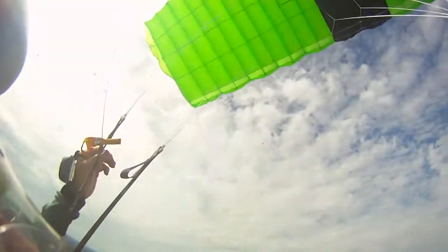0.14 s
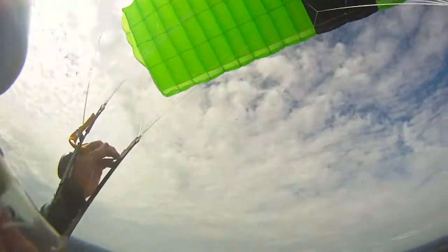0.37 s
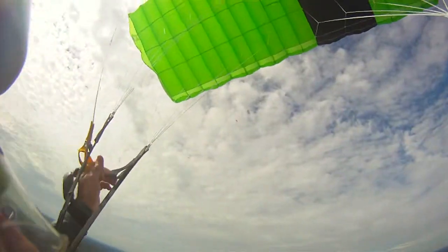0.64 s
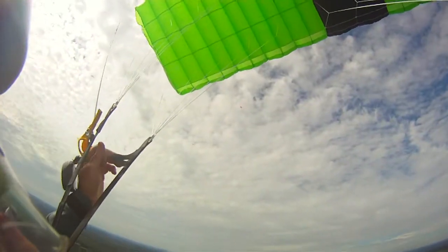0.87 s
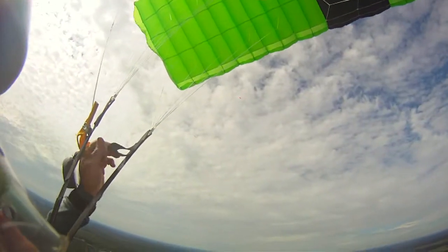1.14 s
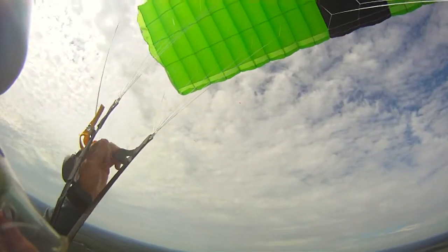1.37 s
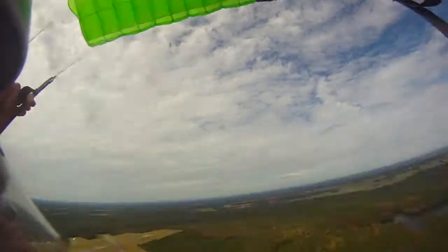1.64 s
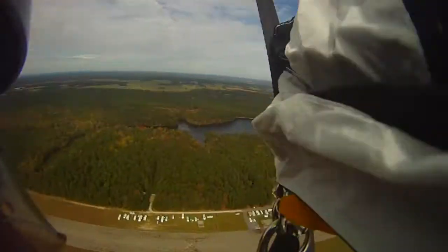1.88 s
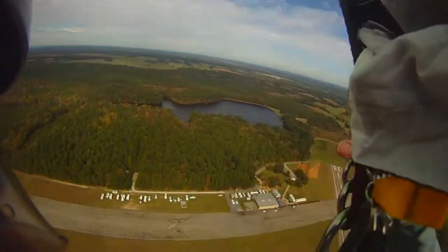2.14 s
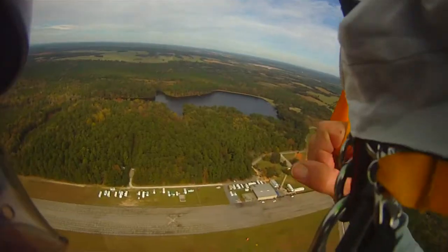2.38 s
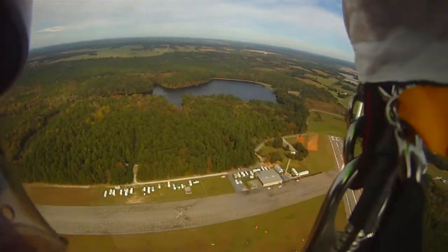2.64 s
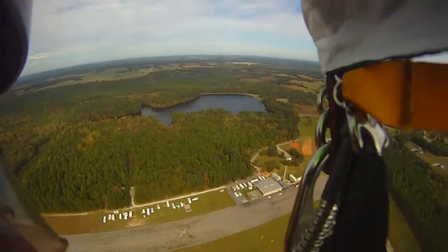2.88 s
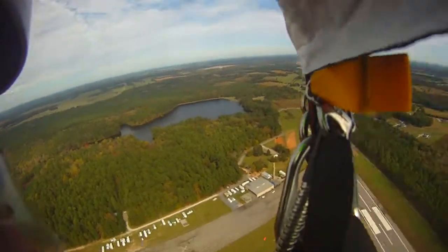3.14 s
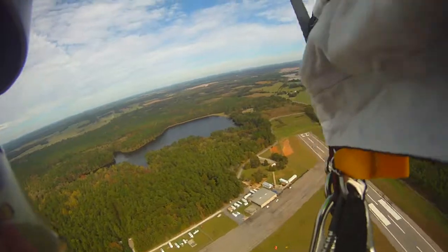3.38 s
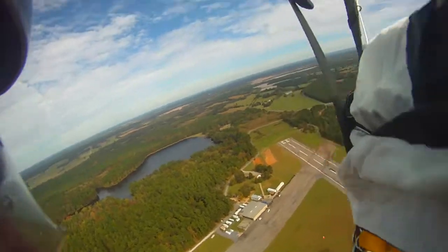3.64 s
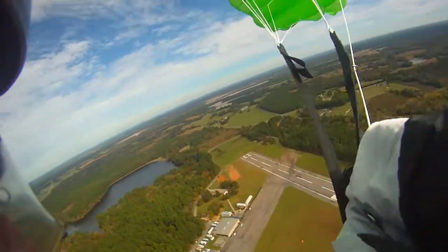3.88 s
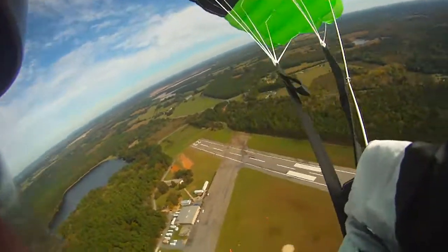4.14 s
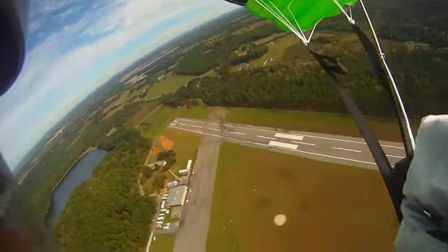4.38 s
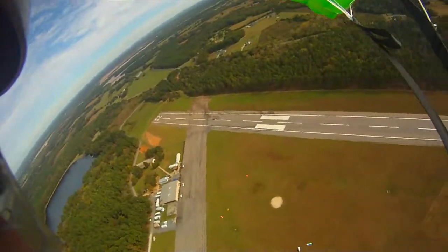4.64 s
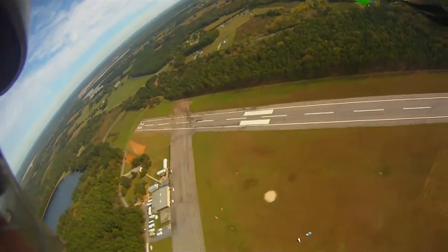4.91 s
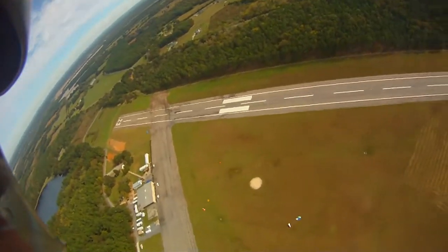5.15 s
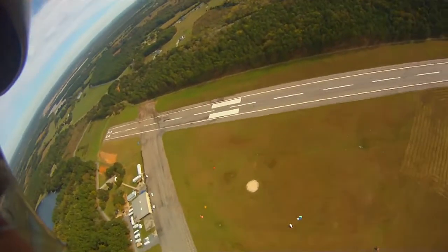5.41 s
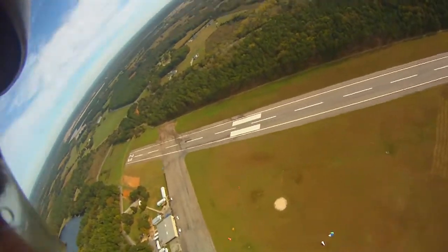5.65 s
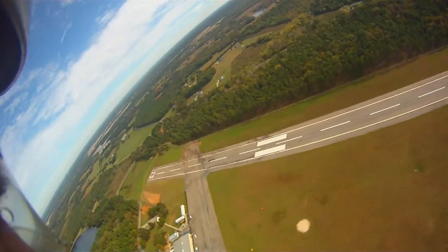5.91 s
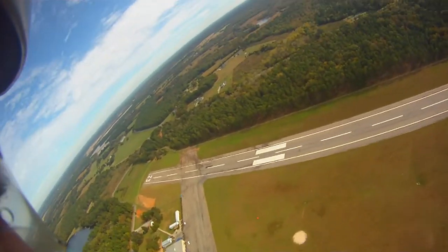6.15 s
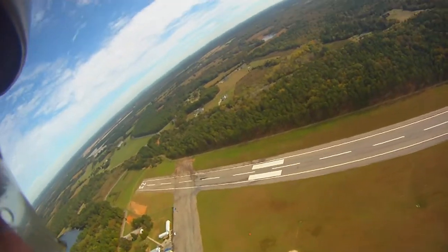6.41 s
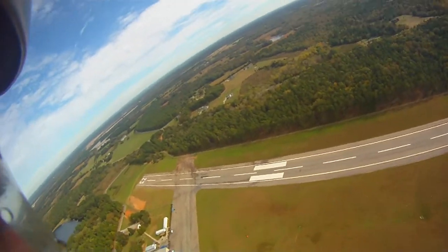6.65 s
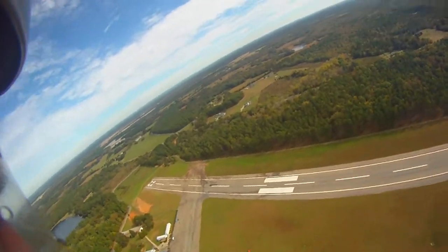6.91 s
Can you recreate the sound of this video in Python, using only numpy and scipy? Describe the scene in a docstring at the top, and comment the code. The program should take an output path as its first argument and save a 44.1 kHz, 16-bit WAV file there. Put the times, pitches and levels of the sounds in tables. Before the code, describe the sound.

Quiet, hollow airy rush under a parachute, then violent wind buffeting thumps the microphone in two bouts, easing into a steady rush with fabric fluttering.

```python
"""Wind rushes over a sealed camera on a helmet under a parachute. When the head turns into the stream, eddies
thump on the microphone port: short pulses over a turbulent wash. Coloured noise makes the rush, the ring of the
hollow housing and the hiss past its edges. Gliding resonances moan and whistle; decaying modes knock and noise
puffs flap; a faint noise floor, cut off above 12.7 kHz, and one thin tone lie beneath."""
import sys
import numpy as np
from scipy import signal
from scipy.fft import next_fast_len
from scipy.io import wavfile
from scipy.ndimage import uniform_filter1d

SR = 44100
rng = np.random.default_rng(int(sys.argv[2]) if len(sys.argv) > 2 else 0)


def wrap_up_sound(samples):
    """Save the sound to the file named by the first command line argument, as 16-bit audio."""
    columns = np.atleast_2d(samples).T
    # keep every value between -1 and 1, then stretch to whole-number steps
    tamed = np.clip(columns, -1, 1)
    steps = np.round(tamed * 32767).astype(np.int16)
    wavfile.write(sys.argv[1], SR, steps)


def gain_from_decibels(decibels):
    """Convert decibel values to linear amplitude factors."""
    exponent = np.asarray(decibels, float) / 20
    return 10 ** exponent


N = 310023
TIME_S = np.arange(N) / SR


def evened(x):
    """Scales to rms 1."""
    return x / np.sqrt(np.mean(x ** 2) + 1e-20)


def curve(rows):
    """Columns of a table, after its times, as values at every sample."""
    times_s, *columns = np.transpose(rows)
    return [np.interp(TIME_S, times_s, column) for column in columns]


def bumps(rows):
    """Sum of bell curves in dB, one per event; length is the full width at 1/e."""
    return sum(db * np.exp(-(2 * (TIME_S - s) / length_s) ** 2) for s, db, length_s in rows)


def colour(x, points, causal=True, size=4096):
    """Filter of energy 1 with the given spectrum: ringing after the input, or symmetric around it."""
    hz, db = np.transpose(points)
    grid_hz = abs(np.fft.fftfreq(size, 1 / SR))
    log_gain = np.log(gain_from_decibels(np.interp(np.log(grid_hz + 1), np.log(hz), db)))
    # the Hilbert transform of the log gain gives minimum phase
    spectrum = np.exp(np.conj(signal.hilbert(log_gain)) if causal else log_gain)
    taps = np.fft.fftshift(np.fft.ifft(spectrum).real)
    return signal.oaconvolve(x, taps / np.linalg.norm(taps))[size // 2:][:len(x)]


def resonate(x, hz, width_hz):
    """Shifts hz down to zero, smooths, and shifts back: a resonance of gain 1."""
    turn = np.exp(2j * np.pi * np.cumsum(hz * np.ones(len(x))) / SR)
    pole = np.exp(-np.pi * width_hz / SR)
    return 2 * (turn * signal.lfilter([1 - pole], [1, -pole], x / turn)).real


def flicker(depth_db, seconds):
    """A random gain of mean power 1 that wanders over the given time."""
    size = max(int(seconds * SR), 1)
    wander = uniform_filter1d(uniform_filter1d(rng.standard_normal(N), size), size)
    return evened(gain_from_decibels(depth_db * evened(wander)))


def impulses(per_s, spread_db):
    """Random clicks, rms 1; a spread makes many small and a few large."""
    sizes = gain_from_decibels(spread_db * np.minimum(rng.exponential(1, N), 2.8))
    return evened((rng.random(N) < per_s / SR) * sizes)


def marks(rows):
    """One click at each event of a table, with the sign of its third column."""
    out = np.zeros(N)
    for s, db, *sign in rows:
        out[int(s * SR)] = gain_from_decibels(db) * np.sign(np.prod(sign))
    return out


def skewed(clicks):
    """Every eddy drags the pressure down, then lets it spring back, whichever way its click points."""
    return clicks + 0.5 * signal.hilbert(abs(clicks), next_fast_len(N)).imag[:N]


def narrow(rows, width_hz):
    """Broken noise in a gliding resonance, sounding only while its table lasts."""
    hz, db = curve(rows)
    once = resonate(rng.standard_normal(N), hz, width_hz)
    fuzzy = evened(resonate(once, hz, width_hz))
    broken = gain_from_decibels(db) * fuzzy * flicker(3.2, 0.015)
    return broken * ((TIME_S > rows[0][0]) & (TIME_S < rows[-1][0]))


def dive():
    """Progress 0-1 of the canopy's dive."""
    return np.interp(TIME_S, [4.7, 6.8], [0, 1])


# stream striking the port as the head turns [t/s, level/dB]
PORT_LEVEL = [(0, -56), (.12, -57.5), (.14, -46.5), (.155, -55), (.2, -51.5), (.3, -55.5), (.41, -57),
              (1.45, -52.5), (1.63, -49), (1.71, -66.5), (1.8, -63.5), (1.86, -40), (1.94, -33.5),
              (2.3, -34), (2.55, -32), (2.78, -34), (2.95, -31.5), (3.1, -34), (3.55, -37), (3.63, -43),
              (3.82, -45), (3.92, -38.5), (4.45, -39), (4.68, -36), (4.76, -37), (4.8, -42.5), (4.9, -39),
              (5.05, -34.5), (5.42, -31.5), (5.66, -35.5), (5.74, -45), (6.0, -54), (6.35, -59.5),
              (7.03, -65.5)]
# port in the wake of the helmet, where eddies push instead of suck [t/s, share 0-1]
WAKE_SHARE = [(0, .85), (.35, .85), (.6, .6), (1.7, .6), (1.9, .45), (2.05, .15), (2.2, .05), (2.7, .05),
              (2.9, .25), (3.1, .2), (3.55, .15), (3.7, .9), (4.1, .85), (4.45, .75), (4.55, .2),
              (4.75, .2), (4.85, .45), (5.03, .1), (5.25, .1), (5.35, .4), (5.5, .35), (5.65, .2),
              (5.75, 0)]
# brief drops of the buffeting [t/s, depth/dB, length/s]
LULLS = [(2.11, 4.5, 0.036), (3.03, 3.5, 0.034), (3.47, 0.5, 0.047), (3.82, 10, 0.026), (4.05, 5.5, 0.033),
         (4.17, 3, 0.041), (4.48, 5.5, 0.046), (4.83, 1.5, 0.17), (5.2, 1.5, 0.3), (5.3, 1, 0.047),
         (5.51, 1.5, .05), (5.62, 0, .04)]
# eddy colour, sheltered and in the full stream [f/Hz, relative level/dB]
SHELTERED_COLOUR = [(60, -31.5), (130, -13), (240, -5.5), (450, -4.5), (900, -14), (1500, -17.5),
                    (3000, -35.5), (9000, -66), (15000, -100)]
EXPOSED_COLOUR = [(60, -41), (130, -18), (240, -4.5), (500, 1), (900, -0.5), (1500, -8), (3000, -22.5),
                  (9000, -53), (13000, -56), (15000, -65)]
# strongest single eddies [t/s, level/dB, -1 suction or +1 push]
THUMPS = [(0.1393, -39, -1), (0.2022, -44, 1), (0.2188, -40, -1), (1.596, -37, -1), (1.9354, -21, 1),
          (1.9507, -23, -1), (2.0486, -29, 1), (2.1583, -23, -1), (2.1669, -28, -1), (2.3185, -17.5, -1),
          (2.3437, -23, -1), (2.3792, -15.5, -1), (2.3833, -20, -1), (2.4422, -18, -1), (2.4947, -21, -1),
          (2.5781, -15, -1), (2.5908, -20, -1), (2.8598, -16, -1), (2.9082, -19, -1), (2.9244, -26, 1),
          (2.9523, -22, 1), (3.0732, -20, -1), (3.1173, -19, -1), (3.2571, -23, -1), (3.2783, -21, -1),
          (3.3286, -23, -1), (3.3845, -26, -1), (3.4129, -27, -1), (3.5109, -21, -1), (3.5362, -28, -1),
          (3.5569, -20.5, -1), (3.763, -34, 1), (3.7705, -32, -1), (3.8813, -27, 1), (3.9149, -23, 1),
          (3.9353, -26, 1), (3.9385, -32, -1), (4.0142, -23.5, -1), (4.1347, -22, -1), (4.3165, -26, 1),
          (4.3254, -25.5, 1), (4.4505, -23, 1), (4.589, -23, 1), (4.6027, -22, -1), (4.7185, -25, 1),
          (4.723, -26, -1), (4.7418, -22, -1), (5.0448, -28, -1), (5.0523, -31, -1), (5.0644, -34, -1),
          (5.0718, -22, -1), (5.1053, -24, -1), (5.1152, -18.5, -1), (5.1258, -20, -1), (5.1446, -16.5, -1),
          (5.1698, -18, -1), (5.1844, -17, -1), (5.2656, -17.5, -1), (5.3757, -16, -1), (5.3965, -17, -1),
          (5.4628, -21, 1), (5.5607, -19, -1), (5.6612, -32, -1)]
# their colour: small and fast, so brighter [f/Hz, relative level/dB]
THUMP_COLOUR = [(60, -30), (240, -13), (600, 3), (1200, -2), (2500, -16), (4500, -23.5), (7000, -38),
                (9000, -50), (15000, -80)]
# large slow eddies [f/Hz, relative level/dB]
RUMBLE_COLOUR = [(20, -54), (60, -8.5), (130, 3.5), (200, 6), (300, 2), (600, -47), (3000, -110)]
# swells and dips of the slow eddies rolling over the helmet [t/s, level change/dB, length/s]
ROLLS = [(.1, -8, 0.17), (.25, 5.5, 0.097), (2.92, 5, 0.27), (3.3, 6.5, 0.14), (3.76, 6.5, 0.052),
         (4.05, 5.5, 0.13), (4.3, 0, 0.18), (4.88, -6, .08), (5.75, -8, .3), (6.15, -1, .5)]


def buffet(shake):
    """Eddies sweep past the port as suction or push pulses, over a turbulent wash and a rumble."""
    port_db, wake = curve(PORT_LEVEL)[0], curve(WAKE_SHARE)[0]
    # the wake dulls the eddies
    bright = np.clip(0.9 - 0.83 * wake + 0.074 * np.log2(flicker(2.6, 0.05)), 0, 1)
    signs = np.where(rng.random(N) < wake, 1, -1)
    wash = 0.66 * rng.standard_normal(N) * shake
    drive = wash + 0.75 * skewed(signs * impulses(600, spread_db=3.0))
    dull_eddies = (1 - bright) * colour(drive, SHELTERED_COLOUR, causal=False)
    bright_eddies = bright * colour(drive, EXPOSED_COLOUR, causal=False)
    gusts = gain_from_decibels(port_db - bumps(LULLS)) * flicker(0.53, 0.028)

    pulse_peak = colour(np.ones(1), THUMP_COLOUR, causal=False)[0]
    thumps = colour(skewed(marks(THUMPS)), THUMP_COLOUR, causal=False) / pulse_peak

    # slow eddies follow the buffeting, dB per dB, and grow in the wake
    rumble_db = -31 + 0.79 * port_db + 13.5 * wake + bumps(ROLLS)
    rumble = colour(rng.standard_normal(N), RUMBLE_COLOUR) * flicker(1.4, 0.063)
    return gusts * (dull_eddies + bright_eddies) + thumps + gain_from_decibels(rumble_db) * rumble


# speed through the air, heard through the housing walls [t/s, level/dB]
AIRSPEED_LEVEL = [(0, -59.5), (.5, -57.5), (1.0, -56.5), (1.8, -52.5), (2.7, -54.5), (3.1, -45),
                  (3.55, -50), (3.7, -53), (4.7, -51.5), (5.5, -44), (6.2, -45), (7.03, -46)]
# air over the housing edges [t/s, level/dB]
EDGE_LEVEL = [(0, -70.5), (1.55, -63), (1.785, -66), (1.81, -48), (1.88, -52), (2.0, -48.5), (2.7, -45),
              (3.0, -48), (3.57, -49.5), (3.64, -56), (4.05, -56.5), (4.2, -55.5), (4.4, -55.5),
              (4.62, -51), (4.85, -55.5), (5.0, -52.5), (5.17, -47.5), (5.6, -42), (5.85, -46.5),
              (6.1, -49), (6.6, -51), (7.03, -53.5)]
# short surges and dips of the rush [t/s, level change/dB, length/s]
SURGES = [(1.87, 8.5, 0.055), (3.8, 12, 0.04), (4.32, 5, .04), (4.9, 6.5, 0.054), (5.27, -7, 0.026),
          (5.45, 4, .05), (5.58, 7, .08)]
# rush through the housing walls [f/Hz, relative level/dB]
RUSH_COLOUR = [(40, -23.5), (200, -19), (400, -15.5), (1000, -5), (1300, 2), (2000, 1.5), (2700, -3),
               (3100, -14.5), (4500, -17), (9000, -44), (15000, -80)]


def rush():
    """Broad turbulent noise through the housing walls, following airspeed and partly the edge flow."""
    air_db, edge_db = curve(AIRSPEED_LEVEL)[0], curve(EDGE_LEVEL)[0]
    rush_db = air_db - 1.5 + 0.24 * (edge_db - air_db) + bumps(SURGES)
    air = rng.standard_normal(N) * flicker(1.3, 0.028) + 0.7 * impulses(300, spread_db=0.0)
    return gain_from_decibels(rush_db) * evened(colour(air, RUSH_COLOUR))


def cavity():
    """Noise rings the air inside the housing; the pitch wavers and climbs in the dive."""
    base_hz, width_hz = 1580, 160
    air_db, port_db = curve(AIRSPEED_LEVEL)[0], curve(PORT_LEVEL)[0]
    # buffeting spoils the ring, dB per dB
    cavity_db = air_db + 0.25 - 0.19 * np.maximum(port_db - air_db, 0)
    steady = rng.standard_normal(N) * flicker(0.42, 0.0085) * flicker(0.54, 0.045)
    waver = 0.0085 * np.log(flicker(7.5, 0.042))
    ring = resonate(steady, base_hz * (1 + 0.018 * dive() + waver), width_hz)
    ring = resonate(ring, base_hz, 8.0 * width_hz)
    return gain_from_decibels(cavity_db) * evened(ring)


# edge hiss, before tilt and pitch shift [f/Hz, relative level/dB]
HISS_COLOUR = [(1000, -41), (2500, -2), (3700, -4), (4600, 0.5), (5400, 2), (6100, -1.5), (6900, -10.5),
               (8500, -21), (10500, -32), (12500, -45), (13500, -46), (15000, -58)]


def hiss_colour(side):
    """Hiss spectrum, dull (-0.5) to bright (+0.5): tilted about 5 kHz, the bright side lower in pitch."""
    sag_share, tilt_db_per_octave = 0.032, 4.5
    return [(hz * (1 - side * sag_share), db + side * tilt_db_per_octave * np.log2(hz / 5000))
            for hz, db in HISS_COLOUR]


def edge_hiss(shake, port):
    """Air hisses past the edges, sputters with the eddies and climbs in pitch as the canopy dives."""
    edge_db, port_db = curve(EDGE_LEVEL)[0], curve(PORT_LEVEL)[0]
    # brighter the more air passes the edges rather than the port
    bright = np.clip(0.92 + 0.1 * (edge_db - port_db), 0, 1)
    # eddies tell once their level nears 13 dB over the hiss
    eddy_power = uniform_filter1d(port ** 2, size=40)
    struck = 1 + 0.81 * eddy_power / gain_from_decibels(edge_db + 13) ** 2
    sputter = np.sqrt(abs(struck / uniform_filter1d(struck, size=4000)))
    spray = rng.standard_normal(N) * sputter * shake ** 0.78 * flicker(1.0, 0.017)
    spray = spray + 0.42 * impulses(250, spread_db=5.0)
    dull_colour, bright_colour = hiss_colour(-0.5), hiss_colour(0.5)
    lifted_colour = [(hz * (1 + 0.033), db) for hz, db in bright_colour]
    diving = dive()
    bright_hiss = (1 - diving) * colour(spray, bright_colour) + diving * colour(spray, lifted_colour)
    hiss = (1 - bright) * colour(spray, dull_colour) + bright * bright_hiss
    return gain_from_decibels(edge_db) * evened(hiss)


def noise_floor_and_tone():
    """Faint hiss with a sharp upper edge, and one thin tone."""
    whine_hz, whine_rms_db, floor_db, floor_edge_hz = 7800, -94, -84, 12700
    tone = np.sqrt(2) * np.sin(2 * np.pi * whine_hz * TIME_S)
    low_pass = signal.firwin(255, floor_edge_hz, window=("kaiser", 9), fs=SR)
    hiss = signal.oaconvolve(rng.standard_normal(N), low_pass, "same")
    return gain_from_decibels(floor_db) * hiss + gain_from_decibels(whine_rms_db) * tone


# low moan of the air while the port is sheltered [t/s, f/Hz, level/dB]
MOAN_GLIDE = [(.3, 210, -78), (.5, 212, -66), (.9, 244, -59.5), (1.3, 223, -65.5), (1.6, 260, -60),
              (1.7, 255, -83)]


def moan():
    """Low gliding resonance of noise, while the port is sheltered."""
    return narrow(MOAN_GLIDE, width_hz=67)


# knocks on the housing [t/s, peak level/dB, share of ring time, rise time/s]
KNOCKS = [(0.307, -41, .7, 0.00041), (1.705, -39, 0.95, 0.00042), (4.141, -21, 0.3, 0.00022),
          (4.1758, -20, 0.85, .00005), (4.17845, -26, .75, .0002)]
# housing modes [f/Hz, relative level/dB, t60 at full ring time/s]
HOUSING_MODES = [(1504, 5, 0.027), (2240, 4.5, 0.014), (3100, -3, 0.013), (3430, -22, .013),
                 (4670, -5, 0.011), (7150, -19, .007), (8600, -24, .005), (12300, -25, .004)]


def knocks():
    """Each knock rings the modes of the plastic housing; a slower blow is duller."""
    t, out = np.arange(2000) / SR, np.zeros(N)
    shell = signal.butter(2, 700, "high", fs=SR, output="sos")  # a small shell radiates no bass
    for s, peak_db, share, rise_s in KNOCKS:
        ring = sum(gain_from_decibels(db - 60 * t / (t60_s * share)) * np.sin(2 * np.pi * hz * t)
                   for hz, db, t60_s in HOUSING_MODES)
        blow = np.hanning(int(rise_s * SR) + 3)
        ring = signal.sosfilt(shell, np.convolve(ring, blow)[:len(t)])
        out[int(s * SR):][:len(t)] += gain_from_decibels(peak_db) * ring / abs(ring).max()
    return out


# fabric flaps [t/s, level/dB before colouring, crispness 0-1]
FLAPS = [(1.815, -48, .9), (1.84, -44, .9), (2.478, -42, .6), (2.5896, -37, 0.3), (2.6424, -37, .6),
         (3.4127, -37, 0.2), (3.79, -52, .3), (3.805, -50, 0.3), (3.9363, -47, 0.65), (4.1463, -37.5, 0.84),
         (4.152, -43, 0.45), (4.1905, -40, 0.3), (4.4139, -41, 0.5), (5.046, -43, .5), (5.064, -44, .9),
         (5.108, -44, .9), (5.169, -42, .9), (5.313, -43, .8), (5.374, -31.5, 0.5), (5.4371, -40, 0.5),
         (5.4785, -42, .95), (5.7397, -48, 0.57), (5.9, -38, 0.5), (5.945, -46, 0.6), (5.99, -45, .6),
         (6.0267, -36, 0.7), (6.067, -36, 0.8), (6.098, -43, .8), (6.134, -44, .8), (6.1498, -35.5, 0.8),
         (6.1568, -42, 0.4), (6.1958, -30, 0.37), (6.2576, -37, .7), (6.307, -40, 0.8), (6.3458, -36, 0.7),
         (6.419, -52, 0.4), (6.4411, -37, 0.64), (6.53, -43, .7), (6.7321, -39, 0.8), (6.775, -43.5, .9),
         (6.9505, -37.5, 0.7)]
# slack flap, then taut snap [f/Hz, relative level/dB]
SLACK_COLOUR = [(300, -19), (800, 8), (1600, 16.5), (3000, 11), (6000, -2), (8000, -12), (12000, -45),
                (15000, -51)]
CRISP_COLOUR = [(800, -25), (1600, 5), (3000, 3), (5000, 6), (7500, -4.5), (10000, -22), (12500, -36),
                (15000, -43)]


def flaps():
    """Each flap is a tick and a noise puff a few ms long, slack or crisp; small ones flutter in the dive."""
    flutter_per_s, flutter_db, flutter_from_s = 40, 3, 5.7
    t = np.arange(900) / SR
    puff = (1 - np.exp(-t / 0.00099)) * np.exp(-t / 0.0013)
    starts = (rng.random(N) < flutter_per_s / SR) * (TIME_S > flutter_from_s)
    small = starts * gain_from_decibels(curve(AIRSPEED_LEVEL)[0] + flutter_db - 6 * rng.random(N))
    air = 3 * rng.standard_normal(N)

    def flapped(clicks):
        """A burst of air behind each click, which stays audible as a tick."""
        return signal.oaconvolve(clicks, puff)[:N] * air + 7.2 * clicks

    puffs, flutter = flapped(marks(FLAPS)), flapped(small)
    crisp = np.clip(curve(FLAPS)[1], 0, 1)
    return colour((1 - crisp) * puffs + flutter, SLACK_COLOUR) + colour(crisp * puffs, CRISP_COLOUR)


# fuzzy whistle at an edge [t/s, f/Hz, level/dB]
WHISTLE_GLIDE = [(5.95, 7300, -74), (6.1, 7400, -66), (6.2, 7600, -66), (6.28, 7600, -63),
                 (6.33, 7350, -65), (6.48, 7200, -67), (6.55, 6900, -63), (6.62, 6850, -62),
                 (6.66, 6450, -61), (6.73, 6650, -62), (6.78, 6850, -65), (6.9, 6800, -72),
                 (7.0, 6700, -76)]


def whistle():
    """Fuzzy whistle at an edge: a high gliding resonance of noise."""
    return narrow(WHISTLE_GLIDE, width_hz=300)


def scene():
    """All sources; buffeting and hiss share one fast turbulence."""
    shake = flicker(1.5, 0.00088)
    port = buffet(shake)
    wind = port + rush() + cavity() + edge_hiss(shake, port) + moan() + whistle()
    return (wind + noise_floor_and_tone() + knocks() + flaps())[None]


def top_cut(x):
    """Nothing passes above the cut-off."""
    return signal.sosfilt(signal.butter(12, 15080, fs=SR, output="sos"), x)


def record(dry):
    """The microphone loses the deepest bass."""
    bass_cut = signal.butter(2, 40, "high", fs=SR, output="sos")
    mix = signal.sosfilt(bass_cut, dry)
    return top_cut(mix)


dry = scene()
out = record(dry)
wrap_up_sound(out)
```